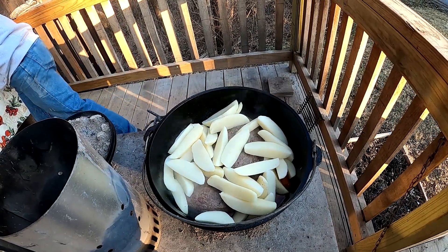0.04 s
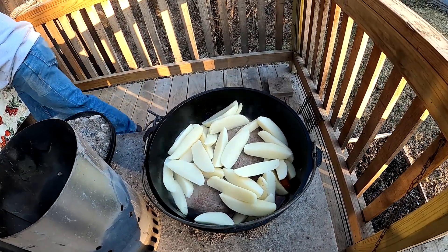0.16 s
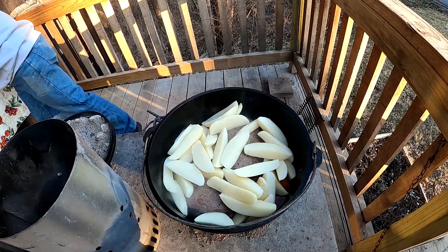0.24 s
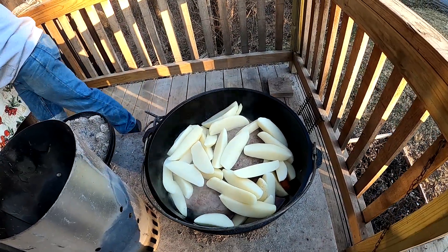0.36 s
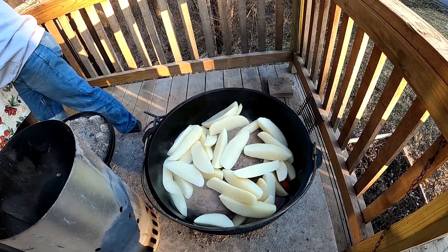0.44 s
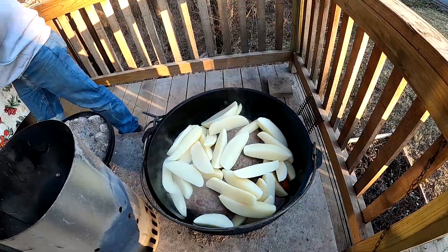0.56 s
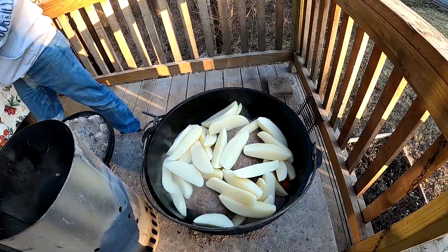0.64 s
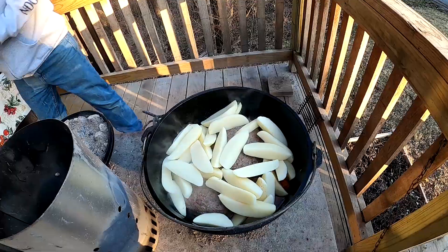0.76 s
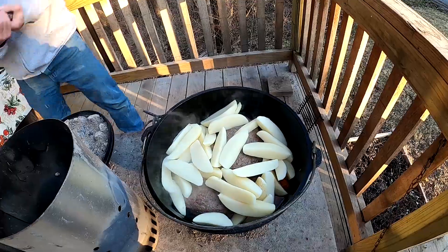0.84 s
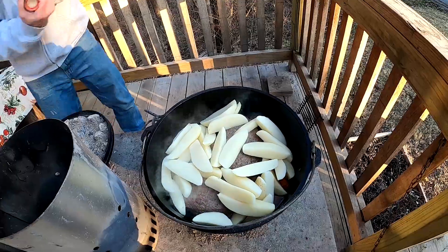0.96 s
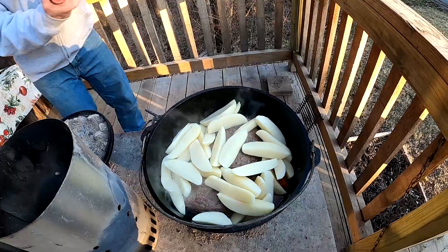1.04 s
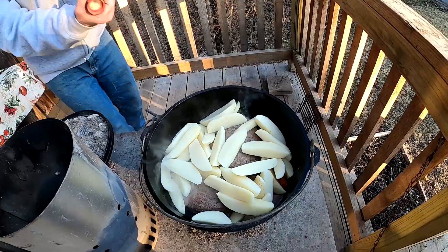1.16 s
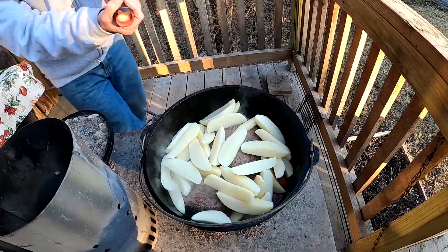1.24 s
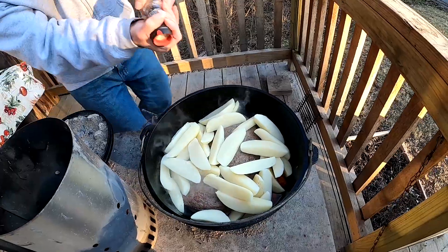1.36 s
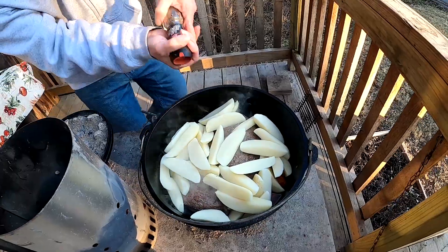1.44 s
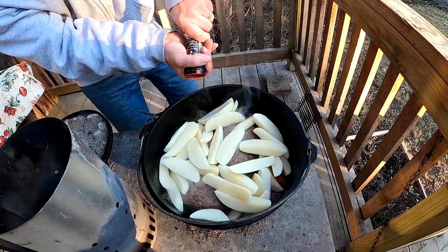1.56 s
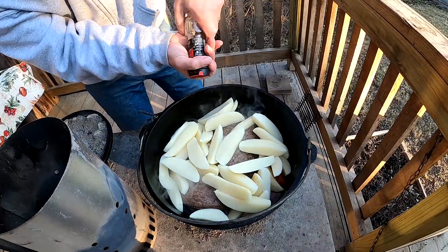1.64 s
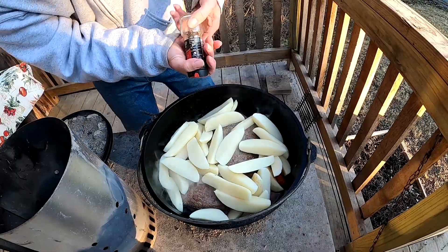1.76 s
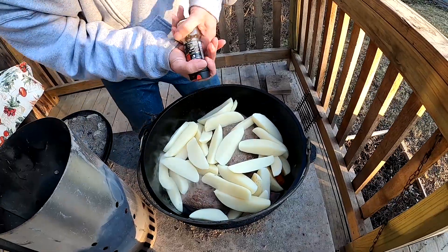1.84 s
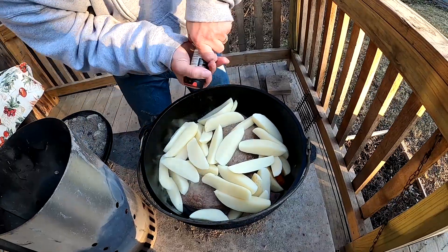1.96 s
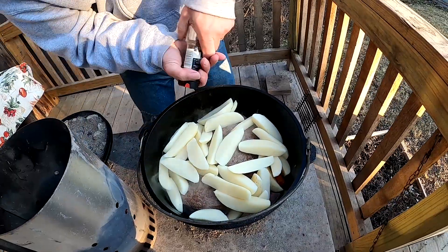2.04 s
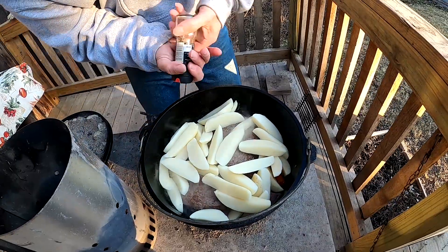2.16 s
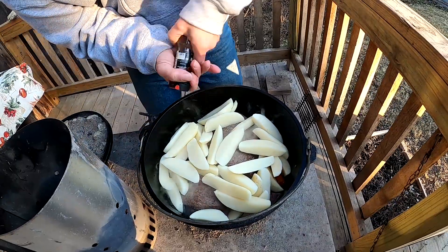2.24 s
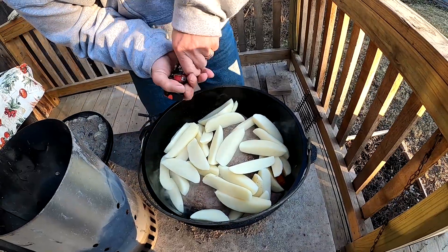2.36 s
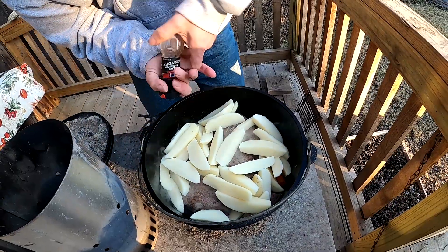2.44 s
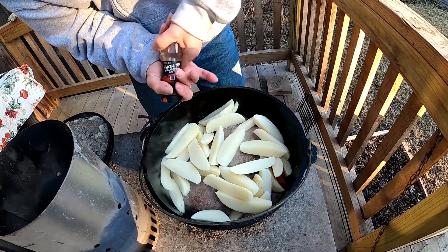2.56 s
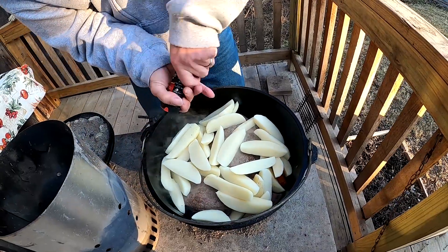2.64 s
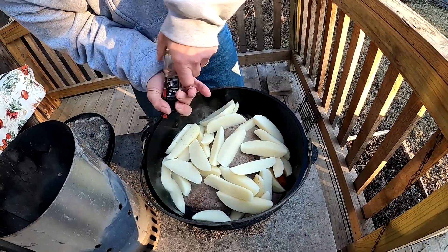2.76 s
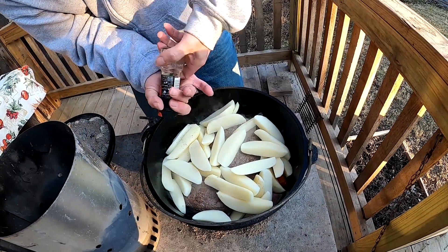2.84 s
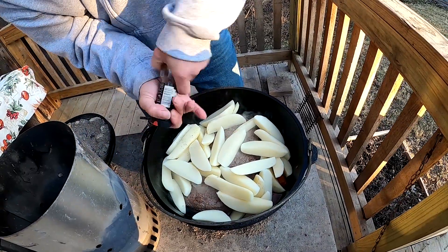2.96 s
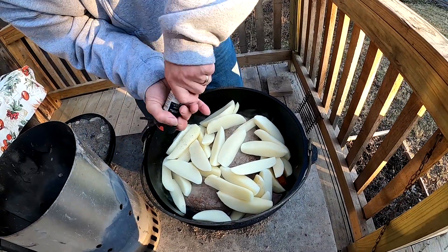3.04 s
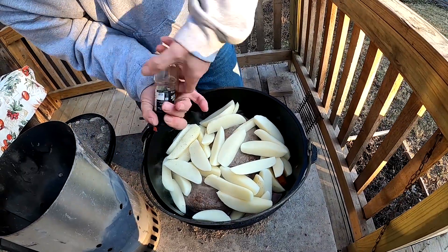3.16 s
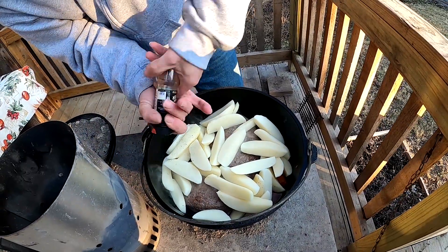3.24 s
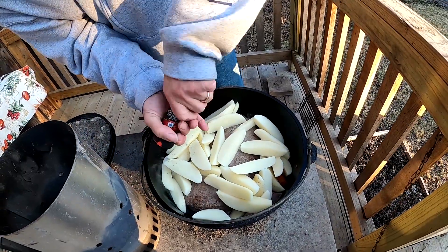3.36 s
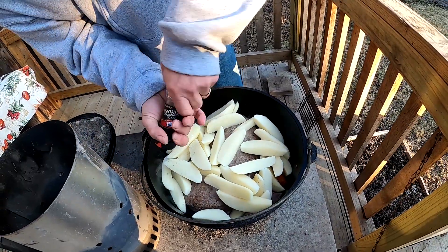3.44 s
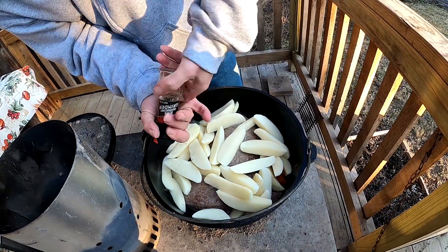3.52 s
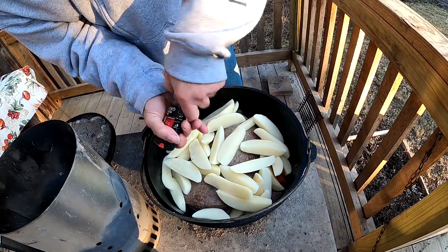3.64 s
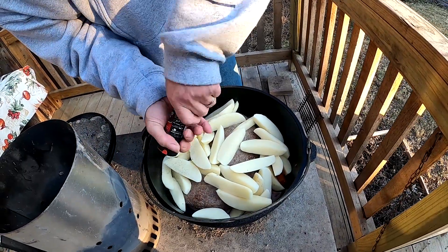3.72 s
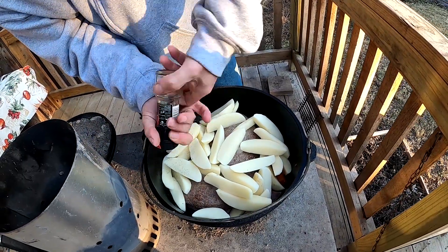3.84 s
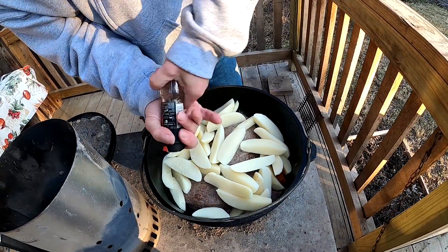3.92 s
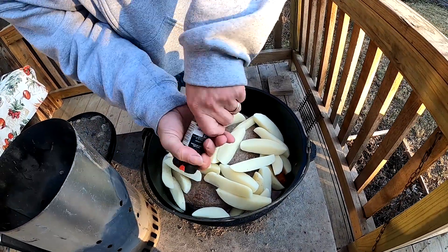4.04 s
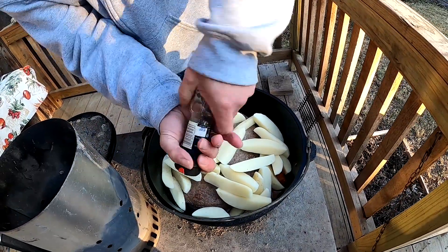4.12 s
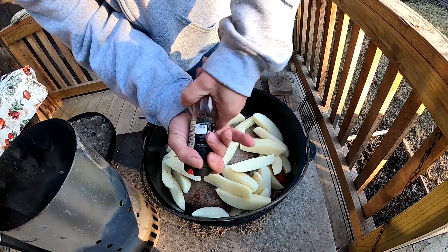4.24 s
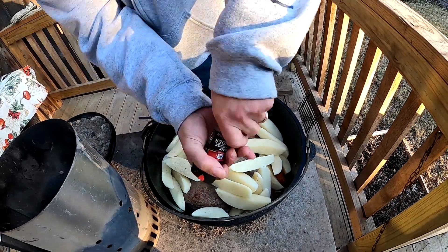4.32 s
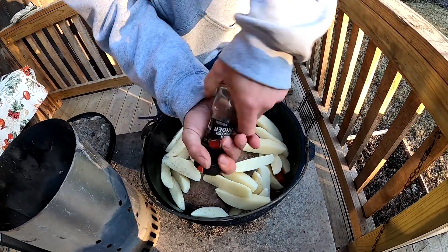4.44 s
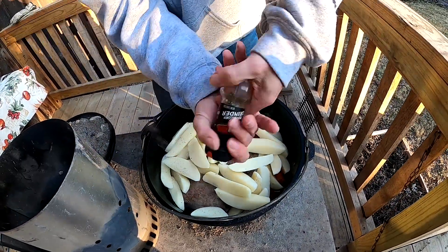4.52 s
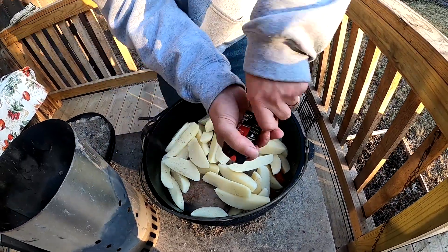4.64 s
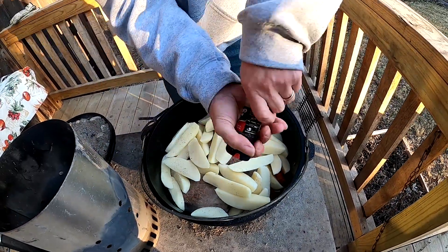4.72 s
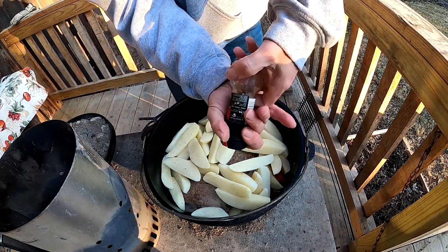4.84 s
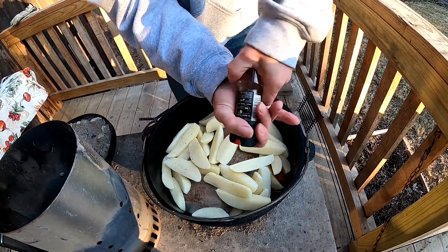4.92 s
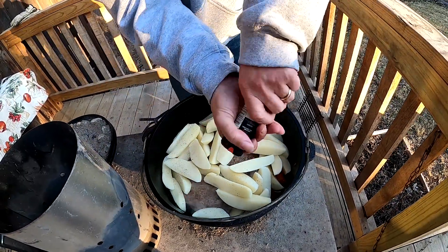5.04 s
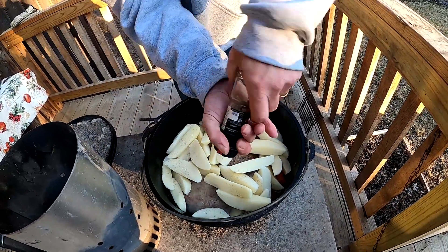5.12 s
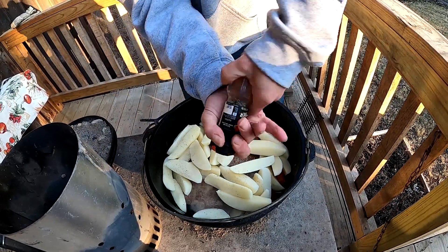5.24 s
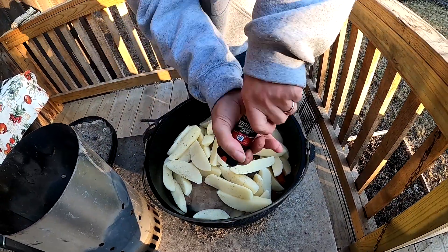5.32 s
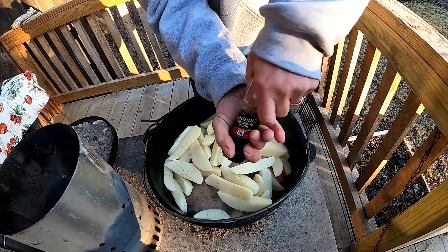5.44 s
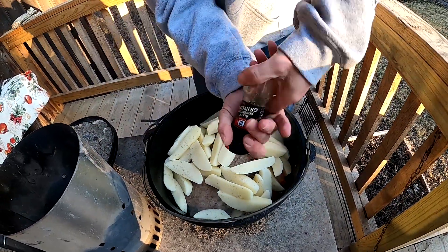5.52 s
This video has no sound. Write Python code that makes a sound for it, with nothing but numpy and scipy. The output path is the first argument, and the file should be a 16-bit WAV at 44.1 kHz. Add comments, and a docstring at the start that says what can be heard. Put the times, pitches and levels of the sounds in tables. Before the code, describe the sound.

Outdoors on a porch, recorded close in stereo: a low deck thud opens, quiet air follows, then footfalls and clothing movement as someone approaches. From one and a half seconds a hand-twisted spice mill gives regular short bursts of sharp cracks and glassy clicks until the end. Tiny high ticks of falling spice, soft board knocks, and distant traffic with light wind sit behind.

```python
"""A foot thumps a wooden deck, then a small hand-twisted spice mill is worked over a pot on the porch.
Each twist cracks grains between the burrs: short jar rings plus bursts of noise. Loose grains rattle between.
Ground spice patters down as tiny high ticks. Footfalls ring the deck boards and scuff them with noise.
Shaped noise makes the wind, rumble, far traffic and rustling clothes; a wavering sine makes a low drone."""
import sys
import numpy as np
from scipy import signal
from scipy.fft import rfft, irfft, next_fast_len
from scipy.io import wavfile
from scipy.ndimage import uniform_filter1d, map_coordinates

SR = 44100
rng = np.random.default_rng(int(sys.argv[2]) if len(sys.argv) > 2 else 0)


def generate_wav(sig):
    """Save sig (samples, or channels by samples) to the path in sys.argv[1] as 16-bit PCM at SR."""
    pcm = np.round(np.clip(np.atleast_2d(sig).T, -1, 1) * 32767).astype(np.int16)
    wavfile.write(sys.argv[1], SR, pcm)


N = 246078

# How the outdoor air swells and sinks.
# Each row: time in seconds, level of the wind buffeting in dB, level of the drone in dB before its wavering.
AIR_LEVELS = [(0, -57.5, -42), (.33, -52, -59), (.85, -49, -50), (1.45, -39.5, -51), (1.9, -47, -56),
              (2.8, -50, -49.5), (3.7, -46.5, -54), (4.1, -49, -62), (4.8, -44.5, -56), (5.2, -58.5, -67.5),
              (5.58, -57.5, -59)]

# The twists of the mill. Each row: time of the bite in seconds, rise to it in seconds, length after it in
# seconds, crunch at the bite in dB, crunch midway in dB (both before the offsets of each kind of crunch),
# strongest ring in Hz, brightness in dB, deep ring in dB (before the jar's own levels).
TWIST_ROWS = [(1.508, .03, .09, -34.5, -27, 2565, -3, 6.5), (1.948, .035, .07, -27, -29, 2555, 1.5, -3.5),
              (2.312, .045, .065, -27, -29.5, 2170, -2, 3.5), (2.66, .008, .058, -28, -28, 2680, 1, 4),
              (3.022, .035, .07, -32.5, -30, 2400, 2.5, 0), (3.356, .018, .075, -30.5, -28.5, 2210, 1, 0),
              (3.693, .035, .062, -28, -32, 2220, -2, 7.5), (4.023, .035, .068, -29.5, -31, 2200, -2, -4),
              (4.345, .035, .085, -30, -33.5, 1790, -3, 1.5),
              (4.668, .027, .095, -29, -30.5, 1915, -3.5, -4.5),
              (5.003, .014, .1, -29.5, -26, 2330, -4.5, -3),
              (5.339, .012, .097, -27, -29.5, 1690, -2.5, 1.5)]


def amp(db):
    """Turns dB into a plain gain."""
    return 10 ** (np.asarray(db) / 20)


def unit(x):
    """Scales a sound to an rms of 1."""
    return x / np.sqrt(np.mean(x ** 2) + 1e-20)


def along(points, hz):
    """Reads a curve of (Hz, value) points on a log frequency axis."""
    f, v = np.transpose(points)
    return np.interp(np.log(hz + 1), np.log(f + 1), v)


def curves(rows):
    """Gives one value per sample for each column after the time."""
    s, *cols = np.transpose(rows)
    return [np.interp(np.arange(N) / SR, s, c) for c in cols]


def wobble(rate):
    """Draws a smooth random curve with rate knots a second."""
    knots = rng.standard_normal(int(N * rate / SR) + 4)
    return map_coordinates(knots, [np.arange(N) * rate / SR])


def filtered(x, response):
    """Multiplies the spectrum of x by a response, which may be complex, at each frequency."""
    m = next_fast_len(N + SR // 2)
    return irfft(rfft(x, m) * response(np.fft.rfftfreq(m, 1 / SR)), m)[..., :N]


def placed(s, rows):
    """Adds up short sounds, one a row, at their times in seconds."""
    at = np.round(s * SR).astype(int)[:, None] + np.arange(rows.shape[1])
    return np.bincount(at.ravel(), rows.ravel(), N + SR)[:N]


def rush(spectrum, patchy_db):
    """Makes stereo noise of rms 1, with patches of random gain in time and pitch."""
    # Likeness of left and right. Each row: frequency in Hz, likeness from 0 to 1.
    likeness = [(30, .8), (70, .88), (160, .99), (950, .67), (3770, .24), (8000, 0)]
    z = signal.stft(rng.standard_normal((2, N)), nperseg=512)[2]
    field = uniform_filter1d(rng.standard_normal(z.shape[1:]), 6, 0)
    field = uniform_filter1d(field, 10, 1)
    pair = signal.istft(z * amp(patchy_db * unit(field)), nperseg=512)[1][:, :N]

    def mix(hz):
        turn = np.arccos(np.clip(along(likeness, hz), -1, 1)) / 2
        return amp(along(spectrum, hz)) * [np.cos(turn), np.sin(turn)]

    mid, side = filtered(pair, mix)
    return unit(np.array([mid + side, mid - side]))


def wind_and_rumble():
    """Wind buffets as very low noise, and a deep rumble partly follows its swings."""
    # Colour of the buffeting. Each row: frequency in Hz, level in dB per Hz.
    buffet_colour = [(10, -12), (26, 7.5), (45, 7.5), (70, -12.5), (100, -59)]
    # Colour of the rumble. Each row: frequency in Hz, level in dB per Hz.
    rumble_colour = [(40, -23.5), (62, -1), (110, -6.5), (200, -9.5), (260, -18), (400, -66.5)]
    wind_db, _ = curves(AIR_LEVELS)
    rumble_db = -49 + 0.35 * (wind_db - wind_db.mean())  # follows 0.35 of the wind's swing
    buffeting = amp(wind_db) * rush(buffet_colour, patchy_db=2.9)
    return buffeting + amp(rumble_db) * rush(rumble_colour, patchy_db=2.0)


def drone():
    """A sine near 179 Hz wavers in pitch and strength."""
    _, drone_db = curves(AIR_LEVELS)
    strength = np.sqrt(2) * amp(3.5 * wobble(11))
    hz = 179 + 7 * wobble(16)
    return amp(drone_db) * strength * np.sin(2 * np.pi * np.cumsum(hz) / SR)


def traffic():
    """Far traffic is a steady wash of patchy noise."""
    # Colour of the wash. Each row: frequency in Hz, level in dB per Hz.
    traffic_colour = [(150, -40.5), (260, 1), (500, -3), (750, -8), (1000, -4), (1500, -5), (2200, -19.5),
                      (3500, -39.5), (6000, -40.5), (9000, -70.5), (13000, -84.5)]
    return amp(-58.5) * rush(traffic_colour, patchy_db=2.53)


def rustle():
    """Clothes rub as high noise: it follows the cook's moves, and every twist stirs the sleeves."""
    # The cook shifts, walks up and works the mill. Each row: time in seconds, level in dB before the stirs.
    moves = [(0, -79), (.03, -66.5), (.145, -68), (.22, -81), (.66, -83), (.745, -70.5), (1.2, -66.5),
             (1.45, -54.5), (1.8, -68), (2.5, -68.5), (2.9, -72.5), (3.5, -70), (4.27, -65.5), (4.95, -65),
             (5.58, -75)]
    # Colour of the cloth. Each row: frequency in Hz, level in dB per Hz.
    cloth_colour = [(1300, -13.5), (2200, -0.5), (5000, -8), (8000, -11), (10500, -18), (13000, -26.5),
                    (14500, -66)]
    stir_db, settle_s = 6, 0.084
    t = np.arange(N) / SR
    stir = 0
    for s, _, length, *_ in TWIST_ROWS:
        stir = stir + (t > s) * np.exp(-np.maximum(t - s - length, 0) / settle_s)
    level_db = curves(moves)[0] + stir_db * stir
    return amp(level_db + 0.51 * wobble(25)) * rush(cloth_colour, patchy_db=1.2)


def shower_level():
    """Gives the patter level in dB: steady within each shower, fading either side."""
    # Ground spice lands a moment after a twist.
    # Each row: middle in seconds, length in seconds, level in dB before the random wobble.
    falls = [(2.25, 0.033, -70), (2.575, .05, -71), (2.917, .07, -79.5), (3.239, 0.035, -73.5),
             (3.315, .04, -73), (3.6, .04, -76), (3.655, .02, -71), (3.96, 0.018, -73), (4.25, .03, -78),
             (4.602, .06, -76), (4.904, 0.059, -67), (4.967, .04, -70), (5.262, .06, -74.5)]
    fade_db_per_s, stray_db = 499.5, -100.5  # a few stray specks always remain
    t = np.arange(N) / SR
    levels = []
    for s, length, db in falls:
        outside_s = np.maximum(abs(t - s) - length / 2, 0)
        levels.append(np.maximum(db - fade_db_per_s * outside_s, stray_db))
    return np.max(levels, axis=0)


def patter(rate):
    """Ground spice lands as tiny high ticks, rate of them a second, each a dying sine near 9100 Hz."""
    s = rng.uniform(0, N / SR, int(rate * N / SR))
    t = np.arange(SR // 150) / SR
    hz = 9100 * np.exp(.035 * rng.standard_normal((len(s), 1)))
    size = amp(4 * rng.standard_normal((2, len(s), 1)))  # drawn apart for left and right
    tick = (1 - np.exp(-t / .0006)) * amp(-60 * t / .008) * np.sin(2 * np.pi * hz * t)
    ticks = unit(np.array([placed(s, g * tick) for g in size]))
    return amp(shower_level() + 2.5 * wobble(7.1)) * ticks


def air():
    """Sums the outdoor air, the cloth and the falling spice."""
    return wind_and_rumble() + drone() + traffic() + rustle() + patter(600)


def steps():
    """Each step or knock rings the deck boards as dying sines, and a noise scuff follows the touch."""
    # Each row: time in seconds, peak of the thud in dB, level of the scuff in dB,
    # decay share (stretches or shortens the die-away).
    footfalls = [(.039, -10.5, -46.5, 1), (0.141, -33, -50.5, 0.77), (.8, -37.5, -68, 0.9),
                 (.92, -30, -52, 0.67), (1.047, -36.5, -34.5, 0.85), (1.079, -37, -42.5, 0.92),
                 (1.305, -23.5, -32, 0.62), (1.322, -27.5, -51, 0.99), (1.892, -33.5, -42.5, 0.54),
                 (3.646, -68, -49, 0.4), (4.674, -37, -45, 0.66), (4.981, -38, -61, 1),
                 (5.122, -36, -39.5, 0.7), (5.319, -38, -60, 0.53)]
    # Ringing boards. Each row: frequency in Hz, level in dB before the thud is scaled to its peak,
    # time to fall 60 dB in seconds at a decay share of 1.
    boards = [(95.6, -11.5, 0.29), (124.8, -11, 0.27), (167.6, 11, 0.051), (194.5, -9, 0.13),
              (223, -10, 0.19), (268.4, -9, 0.11), (330, -14.5, 0.07), (386.5, -20, 0.13), (521, -26, 0.12)]
    # Colour of the scuff. Each row: frequency in Hz, level in dB per Hz.
    scuff_colour = [(150, -15), (350, 6.5), (600, 1), (850, -5.5), (1150, -3), (1800, -10.5), (2550, -13.5),
                    (4000, -27), (6000, -23.5), (12000, -49.5), (16000, -67.5)]
    thuds, grit, t = np.zeros(N + SR), np.zeros(N + SR), np.arange(SR // 3) / SR
    settle = 1 - np.exp(-(t / 0.005) ** 2)  # the sole settles over a few ms
    for s, db, scuff_db, share in footfalls:
        life = t / max(share, .1)
        ring = np.zeros(len(t))
        for hz, level, t60 in boards:
            fade = amp(level + rng.normal(0, .5) - 60 * life / t60)
            ring += settle * fade * np.sin(2 * np.pi * hz * t)
        start = round(s * SR)
        thuds[start:][:len(t)] += amp(db) * ring / abs(ring).max()
        scuff = amp(-60 * life / 0.16) + 1.4 * amp(-60 * life / 0.043)  # a drag, with a tap at its start
        grit[start:][:len(t)] += amp(scuff_db) * scuff * (1 - np.exp(-t / 0.0028))
    rough = unit(filtered(rng.standard_normal(N), lambda hz: amp(along(scuff_colour, hz))))
    return thuds[:N] + grit[:N] * rough


def grip(at):
    """The mill tilts and hands close round it: ring Hz, brightness and deep ring glide between twists."""
    s, *held = np.transpose([(s + length / 2, *held) for s, _, length, _, _, *held in TWIST_ROWS])
    return [np.interp(at, s, c) for c in held]


def strokes():
    """Outlines every twist and rattle as (seconds, dB) points."""
    # Loose grains rattle as the mill is tipped or turned back.
    # Each row: start in seconds, length in seconds, peak in dB before the offsets of each kind of crunch.
    loose = [(1.256, .3, -60.5), (1.677, .1, -46.5), (2.071, .1, -52.5), (2.462, .07, -55.5),
             (3.496, .07, -47), (3.835, .05, -58.5), (4.168, .07, -49.5), (4.458, .1, -45.5),
             (5.482, .07, -47)]
    bite_db, midway, ease_db = 33, 0.57, 12.5  # rise to the bite, place of the middle, loss by the end
    tail_s, tail_db = .045, 31.5  # the dying tail
    peak_share, rise_db, fall_db = 0.53, 14, 24.5  # of a rattle: place of its peak, rise and fall
    outlines = []
    for s, rise, length, db, mid_db, *_ in TWIST_ROWS:
        end_db = mid_db - ease_db
        outlines.append([(s - rise, db - bite_db), (s, db), (s + midway * length, mid_db),
                         (s + length, end_db), (s + length + tail_s, end_db - tail_db)])
    for s, length, db in loose:
        outlines.append([(s, db - rise_db), (s + peak_share * length, db), (s + length, db - fall_db)])
    return outlines


def breaks(s, db, snap_db, focus_db, snap_t60):
    """Grains break: each rings the jar tones that the grip favours and gives a burst of noise.
    Returns the deep ring, the upper ring, the shared snap and the snap that sets left and right apart."""
    # Ringing tones of the jar. Each row: frequency in Hz before its random shift,
    # level in dB before grip and chance, time to fall 60 dB in seconds.
    jar_tones = [(350, -34.5, 0.026), (603, -27.5, 0.022), (1285, -14.5, .015), (1733, 1.5, 0.021),
                 (2101, 3, 0.016), (2547, 0, 0.018), (3028, 3.5, 0.0096), (3558, 3, 0.02),
                 (4180, 0.5, 0.013)]
    t = np.arange(SR // 50) / SR
    hz, level_db, t60 = np.transpose(jar_tones)
    chance = rng.standard_normal((len(s), 2 * len(hz)))
    ring_hz, _, deep_db = (c[:, None] for c in grip(s))
    # the further an upper tone lies from the favoured one, in octaves, the weaker it is
    near_db = np.where(hz < 1400, deep_db, -focus_db * abs(np.log2(hz / ring_hz)))
    gain = amp(level_db + near_db + 4.7 * chance[:, :len(hz)])
    gain /= np.linalg.norm(gain, axis=1, keepdims=True)
    pitch = hz * (1 + 0.061 * chance[:, len(hz):])  # the fingers shift each tone a little
    rise = 1 - np.exp(-t / 0.00034)
    punch = amp(db)[:, None] * rise * (1 + 1.93 * amp(-60 * t / 0.0034))  # first swings are strongest
    tones = []
    for k in range(len(hz)):
        swing = np.sin(2 * np.pi * pitch[:, [k]] * t)
        tones.append(gain[:, [k]] * amp(-60 * t / t60[k]) * swing)
    deep, ring = punch * sum(tones[:3]), punch * sum(tones[3:])
    fade = rise * (amp(-60 * t / snap_t60) + 0.49 * amp(-60 * t / 0.0022))  # a spike, then splinters
    snaps = rng.standard_normal((len(s), 2, len(t))) * fade
    strength = amp(db + snap_db) * np.linalg.norm(fade)
    snaps *= strength[:, None, None] / np.linalg.norm(snaps, axis=2, keepdims=True)
    return np.array([placed(s, deep), placed(s, ring), placed(s, snaps[:, 0]), placed(s, snaps[:, 1])])


def crunch(rate, gain_db, spread_db, snap_db, colour_db):
    """Fragments break at random times under each stroke, rate of them a second."""
    rows = []
    for stroke in strokes():
        s, db = np.transpose(stroke)
        at = rng.uniform(s[0], s[-1], int(rate * (s[-1] - s[0])))
        rows.append([at, np.interp(at, s, db)])
    s, db = np.concatenate(rows, axis=1)
    size, colour = rng.uniform(-0.81, 1, (len(s), 2)).T
    bright_db = grip(s)[1] + snap_db + colour_db * colour
    return breaks(s, db + gain_db + spread_db * size, bright_db, focus_db=7.5, snap_t60=0.017)


def mill():
    """Single cracks and ticks join fine and coarse crunch; left and right differ in treble level and timing."""
    # Cracks and ticks that stand out one by one, from loud breaks to faint lone ticks, and knocks of the jar.
    # Each row: time in seconds, level in dB before the punch of the first swings,
    # snap over ring in dB before the snap is coloured.
    single_cracks = [(1.051, -30.5, -5), (1.22, -51, -4), (1.2647, -42, -2), (1.288, -34.5, -2),
                     (1.3125, -33, 3), (1.3244, -43, 9), (1.356, -23.5, -0.5), (1.4116, -41, 9.5),
                     (1.4201, -39.5, 2.5), (1.4633, -44.5, 9), (1.5007, -28, -16.5), (1.5078, -16, -0.5),
                     (1.5151, -12, 2), (1.5295, -21, -0.5), (1.5347, -12.5, -1.5), (1.5437, -18.5, 10.5),
                     (1.5514, -21, 5.5), (1.5572, -21, 0), (1.5625, -12, -3.5), (1.5701, -17.5, 0.5),
                     (1.5839, -18.5, 5), (1.5899, -17, 4), (1.6, -25.5, -5), (1.6202, -15.5, 4),
                     (1.718, -32, 3.5), (1.731, -35, -10), (1.742, -36.5, -10.5), (1.8913, -45, -12.5),
                     (1.935, -23.5, 2.5), (1.9413, -23.5, -1.5), (1.9522, -15.5, -4.5), (1.9559, -7.5, -8),
                     (1.9589, -16.5, 3.5), (1.9678, -15.5, -11.5), (1.9742, -11.5, 0), (1.9792, -19, -1),
                     (1.9968, -13.5, 0.5), (2.009, -10, -7), (2.0144, -18, -4.5), (2.084, -28.5, -0.5),
                     (2.1028, -42.5, 5), (2.114, -36.5, 2), (2.1272, -36, -4), (2.134, -32, 2),
                     (2.296, -37.5, 4), (2.3156, -27, 15.5), (2.3235, -21, 14.5), (2.3292, -19, 9),
                     (2.339, -26, 6), (2.3516, -15, -2), (2.3585, -24.5, 11.5), (2.4827, -41.5, 12),
                     (2.4942, -39.5, 1.5), (2.6374, -30.5, 5), (2.6604, -13, 1), (2.6849, -13, 2),
                     (2.6844, -23.5, 10), (2.7004, -16, 3.5), (2.707, -17.5, 3.5), (2.821, -56.5, 3),
                     (2.9785, -55.5, 10.5), (3.0089, -36.5, 17.5), (3.024, -11.5, 3), (3.036, -19.5, 5.5),
                     (3.0449, -14.5, 2), (3.0509, -16.5, 4), (3.078, -20, 7), (3.099, -18, -2.5),
                     (3.3522, -19, 1.5), (3.3609, -23, 11), (3.3633, -20, 5.5), (3.3889, -17, 6),
                     (3.419, -17.5, -2.5), (3.434, -23.5, 1), (3.5298, -44, -8), (3.5356, -33.5, -1.5),
                     (3.5472, -32, -16), (3.6321, -46.5, 8), (3.6702, -35.5, 1), (3.687, -27, -8),
                     (3.696, -26.5, 10), (3.6994, -19.5, -2), (3.716, -15, -0.5), (3.7334, -22.5, 6),
                     (3.739, -27, 10.5), (3.7563, -25.5, -4), (3.822, -60, 8), (3.849, -42, 4.5),
                     (3.8939, -60, 11.5), (3.956, -60.5, 13), (3.9725, -61, 13), (4.0127, -27.5, 4.5),
                     (4.042, -20.5, 8), (4.048, -10, -3), (4.0698, -19.5, 4.5), (4.0842, -22.5, 1),
                     (4.0905, -20, 3.5), (4.2062, -27.5, -18), (4.3178, -29, -9), (4.339, -20.5, -15.5),
                     (4.3459, -21, 10), (4.3653, -14, -0.5), (4.3701, -29, 16), (4.3998, -13.5, -1),
                     (4.4253, -27, 3), (4.4303, -22.5, 1.5), (4.4728, -35.5, -1), (4.479, -38, 2),
                     (4.5095, -27, 0.5), (4.64, -33, -4), (4.6632, -28, -13), (4.6826, -15.5, 1.5),
                     (4.7006, -16, -3.5), (4.7312, -29.5, 15), (4.7483, -16.5, -2.5), (4.807, -42.5, -19),
                     (4.9206, -65, 10.5), (4.9937, -28, 3), (5.0202, -11.5, -2.5), (5.0261, -18.5, -1.5),
                     (5.0342, -12, -7), (5.0483, -16, 1), (5.053, -28, -6), (5.0643, -18, -2),
                     (5.0878, -25.5, 10), (5.1083, -21.5, -2), (5.148, -63, 9), (5.297, -60, 8),
                     (5.341, -22, 0), (5.3505, -26.5, 1.5), (5.3696, -21.5, 7.5), (5.396, -25, -20),
                     (5.403, -23, -2.5), (5.4298, -22.5, 1.5), (5.495, -35, -10), (5.5117, -33, 1)]
    # Colour of the snap. Each row: frequency in Hz, gain in dB.
    snap_colour = [(900, -20.5), (2500, -5), (4500, -1), (6200, -1.5), (8000, 0), (10000, -6),
                   (11000, -13.5), (12000, -10.5), (14000, -23), (15700, -30.5), (16300, -45.5)]
    # Left against right. Each row: frequency in Hz, left minus right in dB.
    left_over_right = [(200, -3), (2400, 0), (4400, -1), (8000, -7), (12000, -3.5), (15000, -5.5)]
    s, db, snap_db = np.transpose(single_cracks)
    grains = breaks(s, db, snap_db, focus_db=12.0, snap_t60=0.015)
    grains = grains + crunch(900, gain_db=0.5, spread_db=2.5, snap_db=-0.8, colour_db=2.6)  # fine
    grains = grains + crunch(70, gain_db=6.5, spread_db=6.5, snap_db=0.5, colour_db=6.5)  # coarse
    deep, ring, snap, odd = grains
    side = np.array([[.5], [-.5]])  # left, right

    def edge(hz):  # the small cap radiates little below its first tone
        return 1 / (1 + (1400 / (hz + 1)) ** 8)

    def sides(hz):
        lag = 1.14 * np.exp(-((hz - 6000) / 3500) ** 2)  # left behind right, in radians
        return amp(side * along(left_over_right, hz)) * np.exp(-1j * side * lag)

    snaps = filtered(snap + 0.93 * side * odd, lambda hz: amp(along(snap_colour, hz)))
    return filtered(deep + filtered(ring, edge) + snaps, sides)


def porch(x):
    """Pot, rails and wall answer briefly, differently left and right; a new answer every quarter second."""
    # Each row: frequency in Hz, time for the answer to fall 60 dB in seconds.
    answer_t60 = [(200, 0.079), (2000, 0.081), (10000, 0.074)]
    out, hop = np.zeros((2, N + SR)), SR // 4
    for a in range(0, N, hop):
        hz, t, z = signal.stft(rng.standard_normal((2, SR // 5)), SR, nperseg=128)
        fade = amp(-60 * t / along(answer_t60, hz)[:, None])
        tail = signal.istft(z * fade, SR, nperseg=128)[1]
        wet = signal.fftconvolve(x[:, a:a + hop], tail / np.linalg.norm(tail[0]), axes=1)
        out[:, a + 40:a + 40 + wet.shape[1]] += wet  # 40 samples late, just under 1 ms
    return out[:, :N]


def scene():
    """Sets the mill and the steps in the porch, over the outdoor air."""
    spice, feet = mill(), np.tile(steps(), (2, 1))
    return spice + feet + porch(amp(-12) * spice + amp(-18.0) * feet) + air()


def record(dry):
    """Keeps only the sound below 16200 Hz."""
    return filtered(dry, lambda hz: hz < 16200)


dry = scene()
out = record(dry)
generate_wav(out)
```